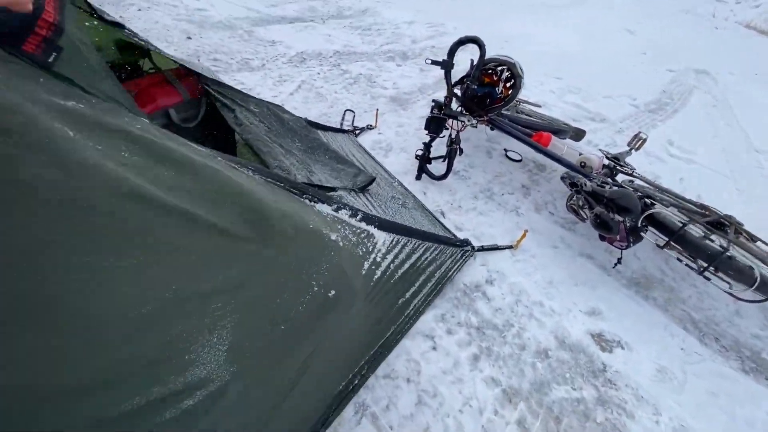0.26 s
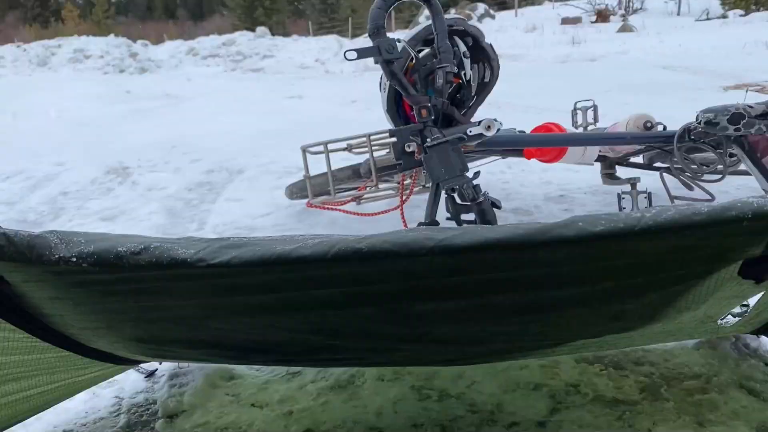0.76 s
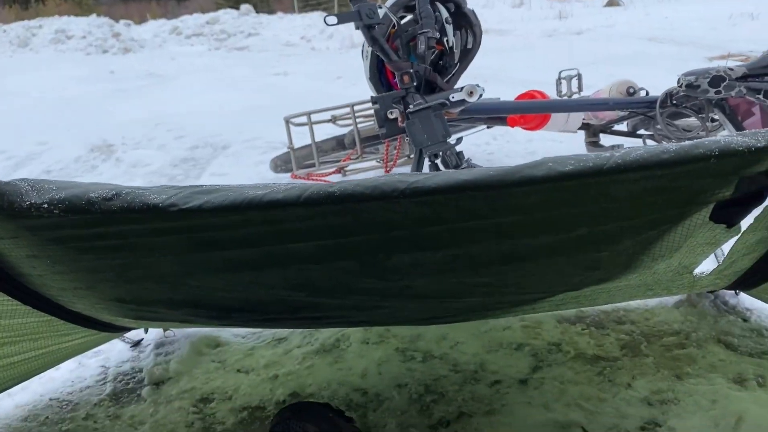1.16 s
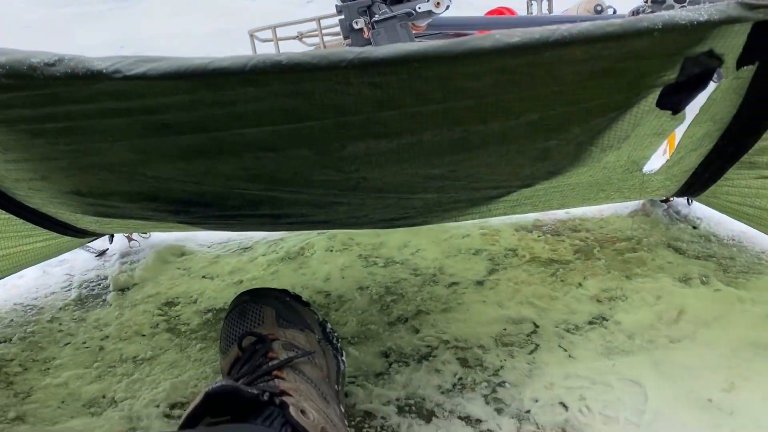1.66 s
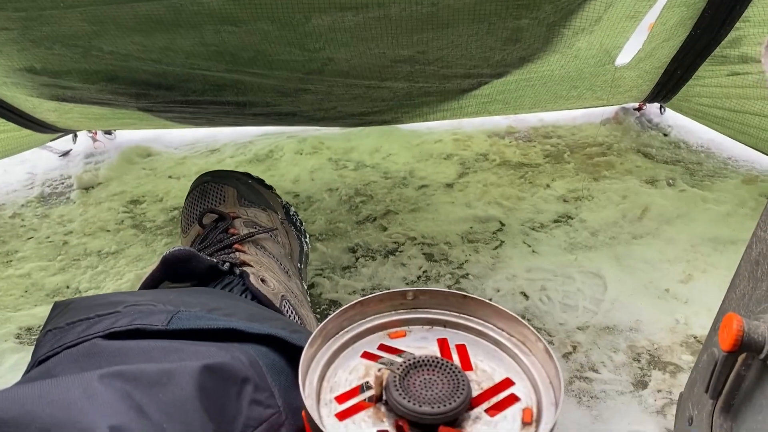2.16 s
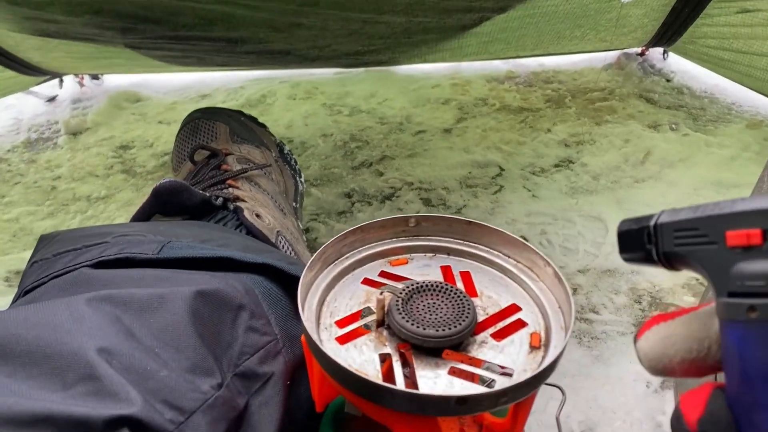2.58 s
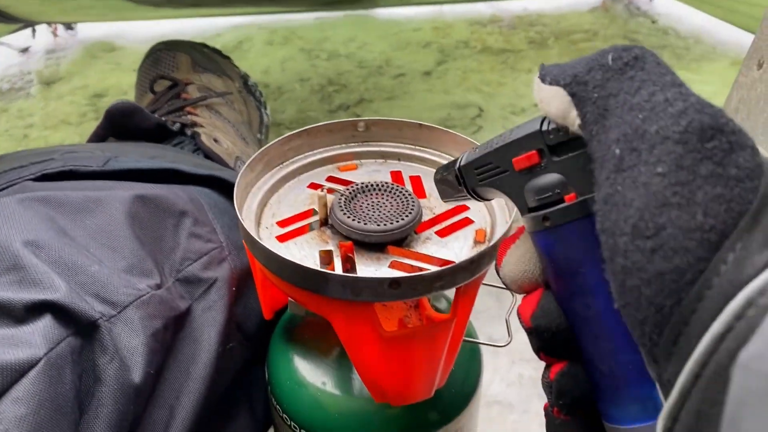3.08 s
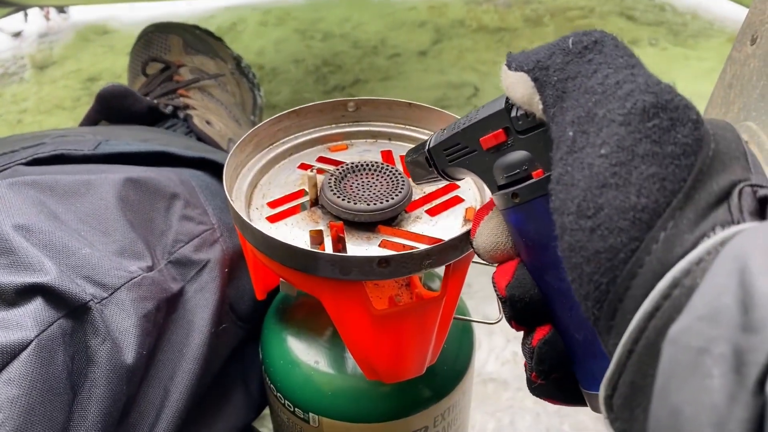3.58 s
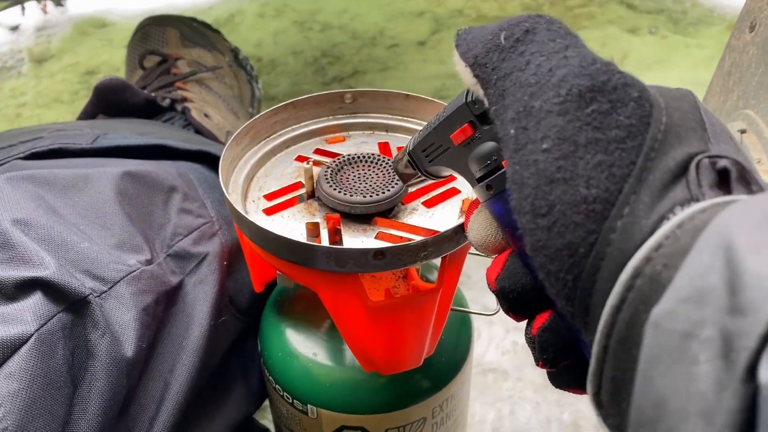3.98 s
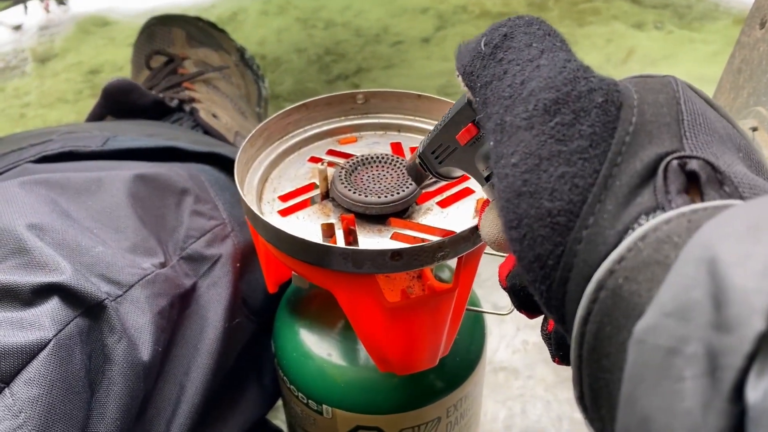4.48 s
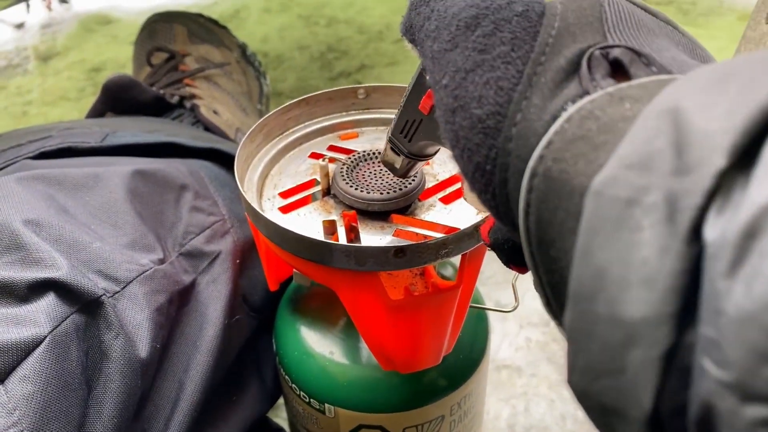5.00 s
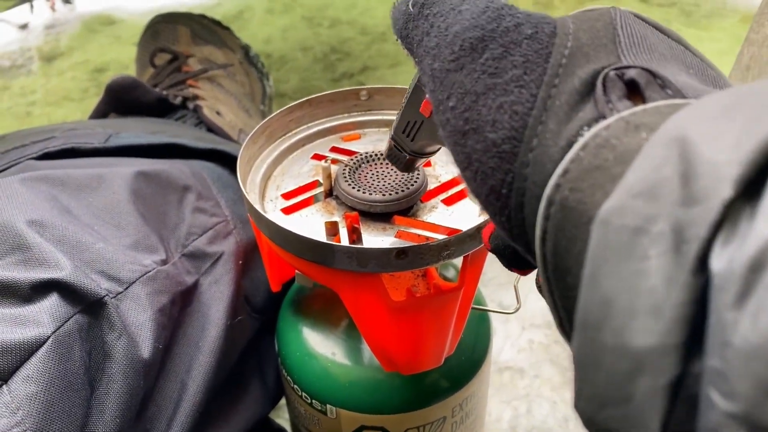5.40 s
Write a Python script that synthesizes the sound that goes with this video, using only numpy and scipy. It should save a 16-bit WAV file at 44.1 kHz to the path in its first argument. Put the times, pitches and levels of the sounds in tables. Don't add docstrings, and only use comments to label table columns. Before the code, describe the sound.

Less than a second of harsh, close snow scraping and flapping tent cloth, cut suddenly to a hushed tent interior. Jacket sleeves swish softly over barely audible air and gas hiss; something hard knocks once. From the middle onward, four bright, hard lighter clicks ring out irregularly, separated by lesser return ticks and a tiny metallic tap. Close camera microphone, almost no echo, levels dipping slightly after peaks.

```python
import sys
import numpy as np
from scipy import signal
from scipy.fft import rfft, irfft, next_fast_len
from scipy.io import wavfile
from scipy.ndimage import uniform_filter1d, map_coordinates

SR = 44100
rng = np.random.default_rng(int(sys.argv[2]) if len(sys.argv) > 2 else 0)


def inscribe(sig):
    pcm = np.round(np.clip(np.atleast_2d(sig).T, -1, 1) * 32767)
    wavfile.write(sys.argv[1], SR, pcm.astype(np.int16))


def gain_from_decibels(decibels):
    exponent = np.asarray(decibels, float) / 20
    return 10 ** exponent


N = 249165
T = np.arange(N) / SR
CUT_S = .777

# (time [s], hold [s], scrape level [dB], push level [dB])
STROKES = [
    (0.004, 0.08, -31, -29),
    (0.211, 0.073, -29.5, -27.5),
    (.3, 0.038, -48, -37),
    (0.436, 0.045, -34, -29),
    (0.509, 0.0054, -30, -32.5),
    (0.637, 0.075, -32, -28),
    (0.758, .01, -52.5, -40),
]
# (rise [dB/s], sag while held [dB/s], fall [dB/s])
SCRAPE_EDGES = (3400, 72, 750)
CLOTH_EDGES = (2100, 19, 205)
BOOM_EDGES = (1100, 26, 410)
# (time [s], hold [s], swish level [dB], fold level [dB], rise [dB/s])
SWISHES = [(0.816, 0.13, -68, -67.5, 90), (1.074, 0.13, -69, -70, 310), (1.283, 0.026, -67, -62, 112),
           (1.5, 0.12, -57.5, -62.5, 62), (1.68, 0.19, -74.5, -69.5, 200), (1.865, 0.11, -55.5, -60, 420),
           (2.064, .14, -63.5, -66.5, 240), (2.286, .71, -55, -61.5, 68), (3.025, .31, -62, -67.5, 210),
           (3.7, 0.014, -63.5, -70, 112.5), (3.765, 0.0054, -63, -70, 520), (4.039, .11, -65, -71, 68),
           (4.277, .03, -70, -81, 88), (4.406, 0.17, -74, -81, 210), (4.604, 0.059, -58.5, -67, 221),
           (5.323, 0.037, -69, -73, 300), (5.476, 0.053, -76, -85, 310)]
# (time [s], level [dB])
BREEZE = [(.8, 0.5), (1.4, 0.1), (2.1, -0.15), (2.7, -0.36), (3.4, -0.56), (4.1, -1.5), (4.6, 0.05),
          (5.1, -3), (5.65, -3.5)]

# (time [s], peak level [dB], late thump level [dB], tilt of the lower half [dB])
SLAPS = [
    (0.2082, -14.5, -40, -6),
    (0.6434, -28, -45, 1),
    (1.8085, -41, -63, 4),
]
KNOCKS = [
    (1.501, -17, -36.5, -0.7),
    (1.5204, -33.5, -50, -0.7),
]
TICKS = [(2.579, -54, -58, -0.85), (3.723, -15, -70, -4.7), (3.734, -51, -64, -0.64), (4.569, -25, -71, 4),
         (4.602, -50, -59, -0.7), (5.356, -28.5, -66, 4), (4.473, -49.5, -74.5, -17),
         (5.311, -52, -66, -13), (5.466, -50.5, -71, -17), (5.49, -51.5, -70, -11),
         (5.516, -54, -71.5, -17)]
SNAPS = [
    (3.484, 0.5, -45, -3.5),
    (4.3191, -0.5, -42.5, -2.5),
    (5.1119, -2, -43.5, -3.5),
    (5.5934, -2, -44, -3),
]
TAPS = [
    (4.719, -49, -73, -0.7),
]

# (frequency [Hz], density [dB per Hz])
SCRAPE = [(1470, -34), (2500, -8.5), (3480, -6.5), (4660, 0), (5550, -2.5), (6550, 1.5), (8910, -8.5),
          (12100, -1), (15500, -13), (16100, -14), (16500, -43.5)]
CLOTH = [(260, -22.5), (450, -5), (707, -7), (964, -5), (1090, -6), (2540, -21.5), (3000, -30), (3900, -25),
         (6600, -120)]
BOOM = [(15, -52.5), (25, -28), (71, 1.5), (112, -2.5), (163, 1), (305, -7), (339, -4.5), (600, -26.5),
        (780, -26), (1320, -120)]
SNOW = [(1470, -37.5), (2500, -12), (5640, 2), (6760, 2), (7670, 1), (12100, 0.5), (15400, -13),
        (16500, -38.5)]
# (frequency [Hz], density [dB per Hz])
SLEEVE = [(3530, -36), (6000, -7), (8420, -9.5), (9280, -5), (12900, 0), (15700, -16.5), (16300, -21.5),
          (16500, -53)]
FOLD = [(1060, -37), (1800, -1), (2970, 4), (4030, -1), (5090, 0), (6390, -4.5), (7000, -10), (9100, -29.5),
        (15400, -120)]
RUMBLE = [(13, -48), (22, -26.5), (42, -7.5), (70, 1), (129, -5), (244, -10), (350, -20.5), (460, -47),
          (770, -120)]
MURMUR = [(140, -28), (230, -6), (297, -8), (447, -1.5), (494, -1.5), (760, -1.5), (990, -38), (1670, -120)]
AIR = [(420, -26), (720, -10.5), (802, 0), (947, 2), (1020, 3), (1220, 1), (1840, -10.5), (1920, -11),
       (2600, -23), (3380, -40), (5720, -120)]
GAS = [(1500, -26), (2300, -11.5), (3000, -2), (3600, -6), (4100, -2), (5400, -10.5), (5800, 5.5),
       (6200, 4), (6800, -11), (9000, -9), (12000, -10.5), (14600, -10.5), (16500, -44)]
# (frequency [Hz], density [dB per Hz])
KNOCK = [(410, -23), (900, -12), (1670, -11), (1880, -3), (2560, -2.5), (3970, -11.5), (5280, -17.5),
         (8500, -31), (12000, -32), (15600, -78), (22000, -120)]
TICK = [(410, -9), (700, -13), (1360, -6), (2130, -13.5), (4400, -3), (4950, -12), (9850, -16.5),
        (12700, -12.5), (15700, -26.5), (16500, -42)]
SNAP = [(530, -65), (1000, -32), (2450, -25.5), (3250, -14.5), (4460, -12), (5360, -16.5), (6510, -13),
        (9060, -13), (10500, -8.5), (12000, -1), (13900, -18.5), (15900, -22.5), (16700, -37.5)]
# (frequency [Hz], density [dB per Hz])
HISS = [(1500, -20.5), (2800, 1), (5000, -0.5), (9000, -5), (13000, -3.5), (15500, -19.5)]

# (frequency [Hz], level [dB], 60 dB decay time [s])
PALM = [(1310, 25, 0.0064), (6200, 18, 0.0053)]
BOX = [(2600, 9, 0.012), (2860, -17, 0.0073), (5670, -8.5, 0.006)]
BUTTON = [(1280, -2, 0.009), (4360, 6, 0.011), (9830, -6.5, 0.01586)]
HAMMER = [(3340, -13, 0.017), (4240, -27.5, 0.12), (4120, -8, .025), (5800, -8.5, 0.038), (7540, -5, 0.017),
          (8500, -11.5, 0.013), (10720, -1, 0.027), (11600, -6, 0.028), (11870, 1, 0.038)]
BURNER = [(4170, 2, 0.2), (5850, -3.5, .15), (11000, -2, .12), (12250, 6, .2)]
# (frequency [Hz], level [dB], 60 dB decay time [s])
SWING = [(98.3, 3, 0.049), (248, 3.5, 0.018), (504, 2.5, 0.02)]
GRIP = [(138, 1, 0.049), (266, 2, 0.046), (500, -6.5, 0.029)]

# (frequency [Hz], share [0-1])
WALL_ALIKE = [(60, 0.07), (150, 0.84), (300, 0.94), (1000, 0.77), (4000, 0.88), (10000, 0)]
TENT_ALIKE = [(60, 1), (300, 0.96), (1000, 0.54), (4000, 0.34), (10000, 0.81)]
HAND_ALIKE = [(60, 1), (300, 0.99), (1000, 1), (4000, 0.42), (10000, 0.79)]
# (frequency [Hz], left minus right [dB])
WALL_LEAN = [(60, 8), (110, 0.5), (200, 1), (380, 1), (700, 2.5), (1290, 9), (2380, 7.5), (4400, -4),
             (8120, -1), (15000, -2)]
TENT_LEAN = [(60, 2), (110, -1), (200, 0.5), (380, -3), (700, 1), (1290, 1), (2380, 0), (4400, -4.5),
             (8120, -6.5), (15000, 8)]
HAND_LEAN = [(60, -0.5), (110, -6), (200, -2.5), (380, -3), (700, -2), (1290, -14.5), (2380, -2),
             (4400, -1.5), (8120, -2.5), (15000, 0.5)]


def unit(x):
    return x / np.sqrt(np.mean(x ** 2) + 1e-20)


def along(points, hz):
    f, v = np.transpose(points)
    return np.interp(np.log(hz + 1), np.log(f + 1), v)


def wobble(rate):
    knots = rng.standard_normal(int(N * rate / SR) + 4)
    return map_coordinates(knots, [T * rate])


def filtered(x, response):
    size = next_fast_len(N + 8192)
    return irfft(rfft(x, size) * response(np.fft.rfftfreq(size, 1 / SR)), size)[..., :N]


def causal(spectrum):
    level_db = along(spectrum, np.fft.rfftfreq(2048, 1 / SR))
    cepstrum = irfft(np.log(gain_from_decibels(np.maximum(level_db, -60))))
    cepstrum[1:1024] *= 2
    cepstrum[1025:] = 0
    pulse = irfft(np.exp(rfft(cepstrum)))[:512]
    return pulse / np.linalg.norm(pulse)


def rush(spectrum, patchy_db, grain_db=0, grain_hz=300):
    z = signal.stft(rng.standard_normal((3, N)), nperseg=512)[2]
    field = uniform_filter1d(rng.standard_normal(z.shape[1:]), size=6, axis=0)
    field = uniform_filter1d(field, size=8, axis=1)
    patchy = signal.istft(z * gain_from_decibels(patchy_db * unit(field)), nperseg=512)[1][:, :N]
    lumpy = patchy * gain_from_decibels(grain_db * wobble(grain_hz))
    return unit(filtered(lumpy, lambda hz: gain_from_decibels(along(spectrum, hz))))


def swells(starts, holds, levels_db, rises, sag, fall, rest_db=-110):
    out = np.full(N, float(rest_db))
    for start, hold, db, rise in np.broadcast(starts, holds, levels_db, rises):
        since = T - start
        onset = rise * np.minimum(since, 0)
        held = sag * np.clip(since, 0, hold)
        release = fall * np.maximum(since - hold, 0)
        out = np.maximum(out, db + onset - held - release)
    return out


def hits(events, colour, crack_t60, tail_t60, tail_db, creak_db, bounce_hz, thumps, modes):
    out = np.zeros((3, N + SR))
    t = np.arange(-882, SR // 6) / SR
    after = np.maximum(t, 0)
    late = np.maximum(t - .0015, 0)
    dull = signal.butter(2, 7000, fs=SR, output="sos")
    pulse = causal(colour)[None]
    for s, db, thump_db, low_db in events:
        rate_hz = bounce_hz * rng.uniform(.85, 1.15)
        chop = .62 + .38 * np.cos(2 * np.pi * rate_hz * (t - .0003))
        shape = chop ** 2 * gain_from_decibels(-60 * after / crack_t60) + gain_from_decibels(tail_db - 60 * after / tail_t60)
        shape = np.where(t < 0, gain_from_decibels(creak_db + 60 * t / 0.048), shape)
        noise = shape * rng.standard_normal((3, len(t)))
        crack = signal.fftconvolve(noise, pulse, axes=1)[:, :len(t)]
        for hz, level_db, t60 in modes:
            turn = 2 * np.pi * hz * rng.normal(1, .008) * t + rng.uniform(0, 2 * np.pi, (3, 1))
            ring_db = level_db - 9 + rng.normal(0, 2) - 60 * after / t60
            crack += (t > 0) * gain_from_decibels(ring_db) * np.sin(turn)
        low = signal.sosfilt(dull, crack)
        crack = np.where(t < 0, low, crack + (gain_from_decibels(low_db) - 1) * low)
        blow = 3 * np.std(crack[0, (t > 0) & (t < crack_t60 / 6)])
        sag = late + 0.0027 * (1 - np.exp(-late / 0.0018))
        thump = sum(gain_from_decibels(level_db - 60 * late / t60) * np.sin(2 * np.pi * hz * sag)
                    for hz, level_db, t60 in thumps)
        thump *= gain_from_decibels(thump_db + 10) * (1 - np.exp(-late / 0.0012))
        out[:, round(s * SR) - 850:][:, :len(t)] += gain_from_decibels(db - 2.0) * crack / blow + thump
    return out[:, :N]


def ports(three, lean, alike, lag, until_hz):
    size = next_fast_len(N + 8192)
    hz = np.fft.rfftfreq(size, 1 / SR)
    turn = np.pi * np.minimum(hz, until_hz) * lag / SR
    share = np.clip(along(alike, hz), 0, 1)
    one, *own = rfft(three, size)
    shared = share * one * np.exp([-1j * turn, 1j * turn])
    both = shared + np.sqrt(1 - share ** 2) * np.array(own)
    return irfft(both * gain_from_decibels(np.outer([.5, -.5], along(lean, hz))), size)[:, :N]


def sweeping():
    s, hold, db, push_db = np.transpose(STROKES)
    scrape_db = swells(s, hold, db, *SCRAPE_EDGES) + 1.5 * wobble(70)
    cloth_db = swells(s, hold, (db + push_db) / 2 - 2, *CLOTH_EDGES, rest_db=-41)
    boom_db = swells(s + 0.018, hold, push_db, *BOOM_EDGES, rest_db=-36)
    scrape = gain_from_decibels(scrape_db) * rush(SCRAPE, patchy_db=1.0, grain_db=2.0, grain_hz=436.0)
    cloth = gain_from_decibels(cloth_db) * rush(CLOTH, patchy_db=2.5, grain_db=1.5, grain_hz=149.1)
    boom = gain_from_decibels(boom_db) * rush(BOOM, patchy_db=0.5, grain_db=0.5, grain_hz=60)
    snow = gain_from_decibels(-55) * rush(SNOW, patchy_db=-0.5)
    return ports(scrape + cloth + boom + snow, WALL_LEAN, WALL_ALIKE, lag=-19, until_hz=11500)


def slapping():
    slap = hits(SLAPS, TICK, crack_t60=0.0069, tail_t60=0.02, tail_db=-29, creak_db=-40,
                bounce_hz=300, thumps=SWING, modes=PALM)
    return slap[0]


def sleeves():
    s, hold, swish_db, crease_db, rise = np.transpose(SWISHES)
    sleeve_db = swells(s, hold, swish_db, rise, sag=3, fall=260) + 3.0
    fold_db = swells(s, hold, crease_db, rise, sag=3, fall=290) + 4.0
    sleeve = gain_from_decibels(sleeve_db) * rush(SLEEVE, patchy_db=0.4, grain_db=1.0, grain_hz=264.0)
    fold = gain_from_decibels(fold_db) * rush(FOLD, patchy_db=-1.5, grain_db=1.5, grain_hz=122.7)
    return sleeve + fold


def breeze_and_gas():
    breeze_db = np.interp(T, *np.transpose(BREEZE))
    rumble = gain_from_decibels(-56 + breeze_db) * rush(RUMBLE, patchy_db=-0.9, grain_db=1.0, grain_hz=17)
    canvas = gain_from_decibels(-62.5 + 3.3 * breeze_db) * rush(MURMUR, patchy_db=1.0, grain_db=-0.5, grain_hz=23.8)
    air = gain_from_decibels(-57.5 + 1.2 * breeze_db) * rush(AIR, patchy_db=1.5, grain_db=-1.0, grain_hz=41.9)
    gas = gain_from_decibels(-72.5 + breeze_db) * rush(GAS, patchy_db=2.2)
    return rumble + canvas + air + gas


def tent():
    return ports(sleeves() + breeze_and_gas(), TENT_LEAN, TENT_ALIKE, lag=16.63, until_hz=5860)


def knocking_and_tapping():
    knock = hits(KNOCKS, KNOCK, crack_t60=0.025, tail_t60=0.048, tail_db=-17, creak_db=-48,
                 bounce_hz=400, thumps=SWING, modes=BOX)
    tap = hits(TAPS, SNAP, crack_t60=0.008, tail_t60=0.05, tail_db=-17, creak_db=-40,
               bounce_hz=500, thumps=SWING, modes=BURNER)
    return ports(knock + tap, TENT_LEAN, HAND_ALIKE, lag=17, until_hz=5660)


def lighter():
    tick = hits(TICKS, TICK, crack_t60=0.022, tail_t60=0.038, tail_db=-21.5, creak_db=-27,
                bounce_hz=543, thumps=GRIP[1:], modes=BUTTON)
    snap = hits(SNAPS, SNAP, crack_t60=.033, tail_t60=.07, tail_db=-38, creak_db=-29,
                bounce_hz=780, thumps=GRIP, modes=HAMMER)
    return ports(tick + snap, HAND_LEAN, HAND_ALIKE, lag=17, until_hz=5570)


def scene():
    fade = np.clip((T - CUT_S - .012) / .012, .06, 1)
    place = np.where(T < CUT_S, sweeping(), fade * tent())
    return place + slapping() + knocking_and_tapping() + lighter()


def low_pass(x):
    return signal.sosfilt(signal.butter(12, 16830, fs=SR, output="sos"), x)


def record(dry):
    duck_from_db, duck_db, recover_s = -14.5, -8, .07
    over_db = np.maximum(20 * np.log10(np.abs(dry).max(0) + 1e-9) - duck_from_db, 0)
    recent_db = uniform_filter1d(over_db, size=441, origin=220)
    push = signal.lfilter([1], [1, -np.exp(-1 / (recover_s * SR))], recent_db)
    ducked = dry * gain_from_decibels(duck_db * np.tanh(push / 270))
    clipped = ducked / (1 + np.abs(ducked / .9) ** 6) ** (1 / 6)

    hiss = unit(filtered(rng.standard_normal((2, N)), lambda hz: gain_from_decibels(along(HISS, hz))))
    hissing = clipped + gain_from_decibels(-77.5) * hiss
    top_hz, top_db = [15750, 15900, 16550, 16850], [0, -18, -18, -60]
    left, right = filtered(hissing, lambda hz: gain_from_decibels(np.interp(hz, top_hz, top_db)))

    middle, wide = (left + right) / 2, (left - right) / 2
    side = filtered(wide, lambda hz: np.clip((11850 - hz) / 300, 0, 1))
    peak = np.clip(40 * uniform_filter1d(over_db, size=882), 0, .3)
    side += peak * (wide - side)
    return low_pass(np.array([middle + side, middle - side]))


dry = scene()
out = record(dry)
inscribe(out)
```